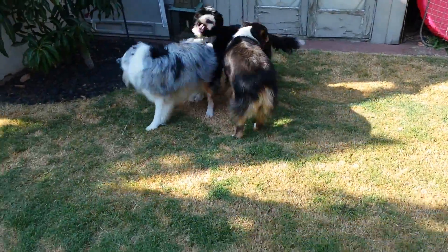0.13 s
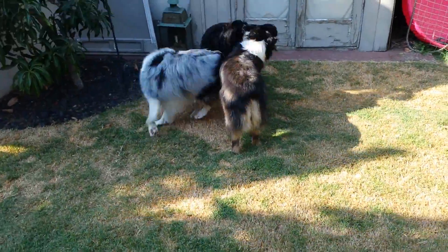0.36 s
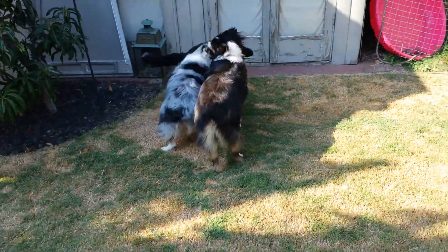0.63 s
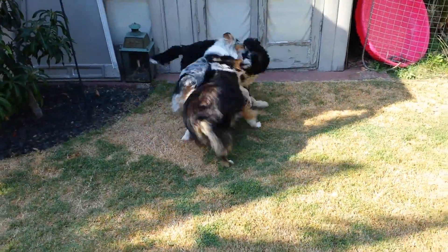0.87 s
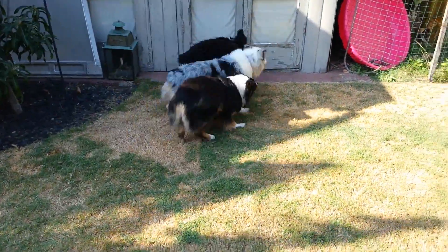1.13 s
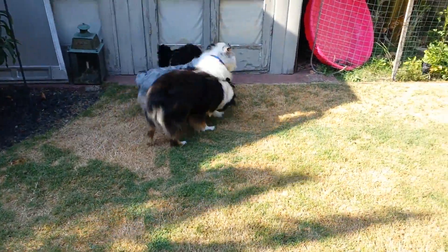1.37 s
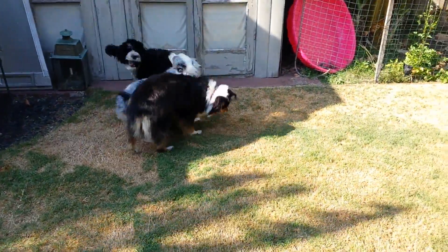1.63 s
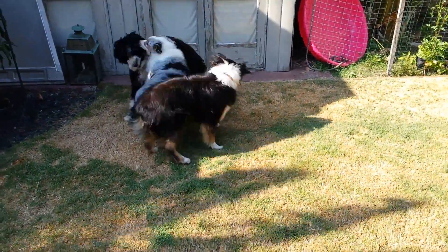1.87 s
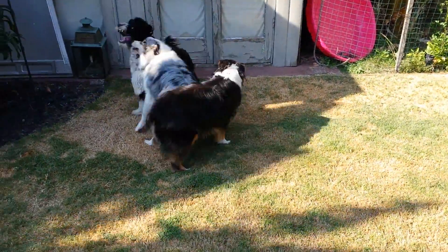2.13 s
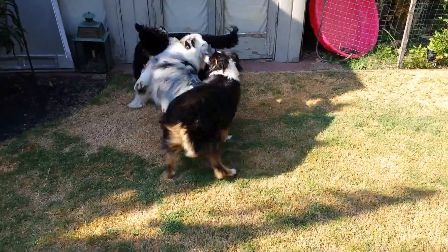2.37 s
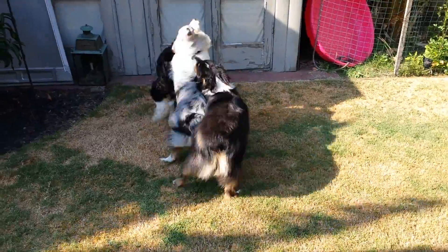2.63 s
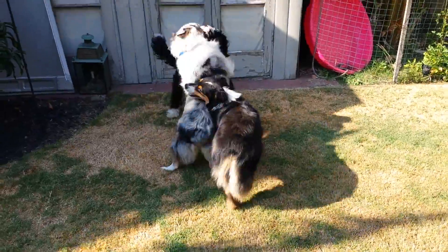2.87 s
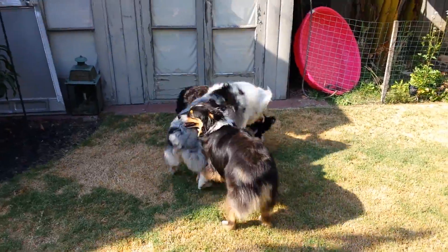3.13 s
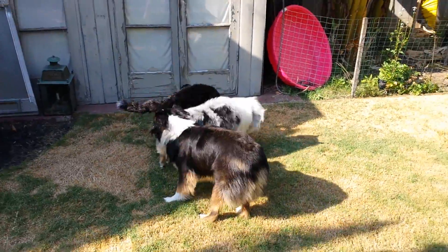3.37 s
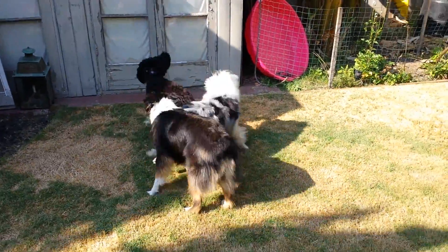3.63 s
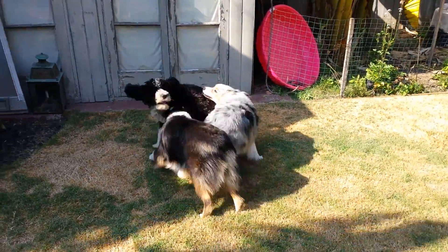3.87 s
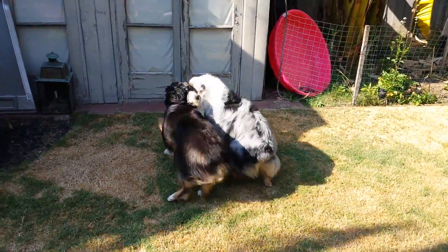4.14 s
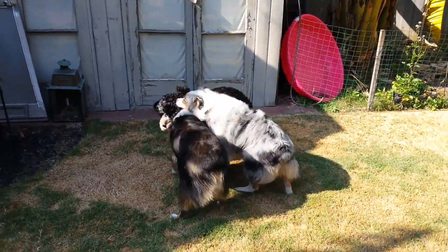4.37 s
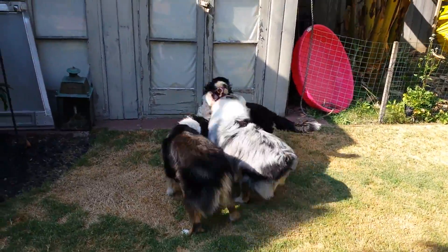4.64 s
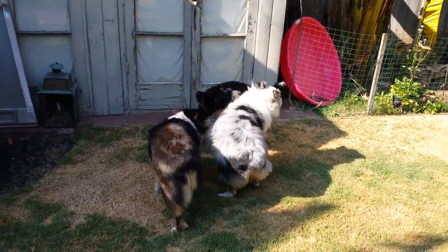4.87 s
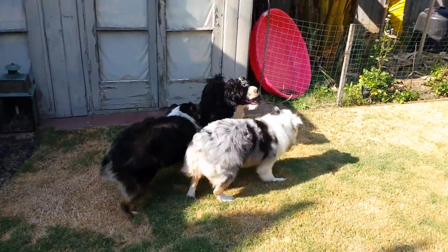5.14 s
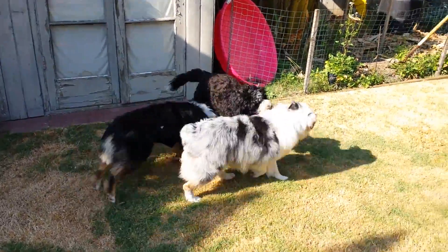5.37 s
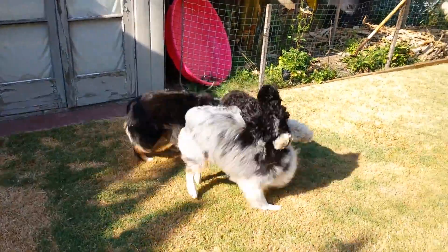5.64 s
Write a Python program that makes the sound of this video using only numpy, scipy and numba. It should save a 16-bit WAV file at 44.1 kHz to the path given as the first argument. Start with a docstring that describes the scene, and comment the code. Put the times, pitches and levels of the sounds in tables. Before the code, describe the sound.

A small outdoor yard with hard walls: rough, yapping barks, abrupt and far louder than everything else, bounce back quickly. Between them come short, low, fluttering growls, puffs of breath, crackly paw scuffs and tiny metallic tag clicks. Barks cluster at the start, then appear singly; growling thickens late, with a brief whimper before the final bark. Compact stereo microphone, quiet airy rumble beneath.

```python
"""Dogs wrestling in a walled yard

Low growls swell between hoarse barks (pulsed folds through mouth and throat resonances) that slap back off
shed and fences (delays, feedback lines). A thin whine (sine) and huffs (noise bursts) join in, paws scuff
dry grass (grains and hiss), collar tags tick (noise and decaying sines), and a faint rumble and air
(shaped noise) lie underneath. Two close ports hear it all."""
import sys
import numpy as np
from scipy import signal
from scipy.fft import rfft, irfft
from scipy.io import wavfile
from scipy.ndimage import uniform_filter1d
from numba import njit

SR = 44100
rng = np.random.default_rng(int(sys.argv[2]) if len(sys.argv) > 2 else 0)


def volts_from_db(level):
    """Convert decibel levels to linear amplitude ratios."""
    exponent = np.asarray(level, float) / 20
    return 10 ** exponent


def inscribe(sig):
    """Save sig as 16-bit PCM at rate SR to the path in sys.argv[1].

    A 1-D sig is mono; a 2-D sig holds one channel per row.
    Samples are clipped to [-1, 1] before scaling.
    """
    pcm = np.round(np.clip(np.atleast_2d(sig).T, -1, 1) * 32767)
    wavfile.write(sys.argv[1], SR, pcm.astype(np.int16))


N = 253575
TIME = np.arange(N) / SR


def unit(x):
    """Scale to rms 1."""
    return x / np.sqrt(np.mean(x ** 2))


@njit
def svf(x, hz, width_hz):
    """State-variable band-pass with a moving centre, gain 1 there."""
    out, band_state, low_state = np.empty(len(x)), 0., 0.
    for i in range(len(x)):
        g, k = np.tan(np.pi * hz[i] / SR), width_hz / hz[i]
        v = (band_state + g * (x[i] - low_state)) / (1 + g * (g + k))
        band_state = 2 * v - band_state
        low_state += 2 * g * v
        out[i] = k * v
    return out


def band(x, hz, width_hz):
    """A steep resonance: the band-pass twice."""
    hz = hz + np.zeros(N)
    once = svf(x, hz, 1. * width_hz)
    return svf(once, hz, 1. * width_hz)


def resonate(x, modes):
    """Parallel resonances, neighbours in opposite sign; rms 1."""
    total = 0
    for k, (hz, width_hz, db) in enumerate(modes):
        total = total + (-1) ** k * volts_from_db(db) * band(x, hz, width_hz)
    return unit(total)


def shape(x, points, power=1.0):
    """Colour by (f/Hz, gain/dB) points joined on a log axis; power scales the dB."""
    hz, db = np.transpose(points)
    log_f = np.log(np.arange(N // 2 + 1) * SR / N + 1)
    gain = volts_from_db(power * np.interp(log_f, np.log(hz), db))
    return irfft(rfft(x) * gain, N)


def walk(rate_hz):
    """Random levels joined by straight ramps 1 / rate_hz long; rms near 1."""
    k = int(SR / rate_hz)
    held = np.repeat(rng.standard_normal(N // k + 1), k)
    return 1.3 * uniform_filter1d(held, k)[:N]


def swells(start_s, hold_s, db, rise_db_s, fall_db_s):
    """Level in dB of the loudest sound at each moment; each rises steadily to start, holds, falls steadily."""
    coarse = TIME[::32]
    t = coarse - start_s[:, None]
    rise = rise_db_s * np.minimum(t, 0)
    fall = fall_db_s * np.maximum(t - hold_s[:, None], 0)
    rows = db[:, None] + rise - fall
    return np.interp(TIME, coarse, rows.max(axis=0))


@njit
def folds(hz, rough, chance, jitter, shimmer):
    """A pulse each time the vocal folds close; rough cycles scatter in length and strength."""
    pulses, phase, p, k = np.zeros(len(hz) + 1), np.empty(len(hz)), 0., 0
    for i in range(len(hz)):
        step = hz[i] * np.exp(jitter * rough[i] * chance[k, 0]) / SR
        p += step
        if p >= 1:
            p, k = p - 1, k + 1
            size = np.exp(shimmer * rough[i] * chance[k, 1]) / np.sqrt(step)
            # split between two samples to place the pulse between them
            pulses[i] += size * p / step
            pulses[i + 1] += size * (1 - p / step)
        phase[i] = p
    return pulses[:-1], phase


def larynx(hz, rough, jitter, shimmer):
    """Pulses plus breath that puffs once a cycle, the breath alone, and the bare fundamental."""
    chance = np.clip(rng.standard_normal((N // 40, 2)), -2, 2)
    pulses, phase = folds(hz, rough, chance, jitter, shimmer)
    breath = unit(np.exp(-phase / 4.8) * rng.standard_normal(N))
    tone = np.sqrt(2) * np.sin(2 * np.pi * phase)
    return pulses + rough * breath, breath, tone


def barks():
    """Pitch shoots up through a narrow mouth resonance that rings when a harmonic meets it."""
    # one row a bark: mouth resonance jaw shut f/Hz, jaw open f/Hz, least roughness (0-1)
    jaws = [(850, 800, .33), (520, 745, .13), (650, 630, .22), (745, 742, .22), (730, 770, .18)]
    # throat resonances, jaw open: f/Hz, width/Hz, relative level/dB
    throat = [(1213, 260, 10), (1780, 700, -1.5), (2338, 200, -2.5), (2687, 250, -17)]
    # bands of hoarse breath: f/Hz, width/Hz, mean level re mouth/dB
    rasp_bands = [(5485, 1200, -27), (7310, 1020, -27.5)]
    which, hz, level_db, upper_db, age_s = bark_controls()
    hz = hz * (1 + .01 * walk(40))  # the pitch wavers
    level_db = uniform_filter1d(level_db, SR // 200)
    shut_hz, open_hz, rough = np.array(jaws)[which].T
    rough = rough * np.clip(300 / hz, 1, 1.7)  # low notes are hoarser
    source, breath, tone = larynx(hz, rough, jitter=.13, shimmer=1.1)

    jaw = np.clip((hz - 250) / 90, 0, 1)  # the jaw drops as the pitch climbs
    mouth_hz = shut_hz + jaw * (open_hz - shut_hz)
    mouth = unit(band(source, mouth_hz, 246.0))
    modes = [(f * (1 + 0.048 * (jaw - 1)), width_hz, db) for f, width_hz, db in throat]
    upper = volts_from_db(upper_db) * resonate(source, modes)
    rasp = 0
    for f, width_hz, db in rasp_bands:
        rasp = rasp + volts_from_db(db + 3.05 * walk(44.56)) * unit(band(breath, f, width_hz))

    # the fundamental sounds through the chest, fades as the pitch climbs, and dies away after 50 ms
    chest_db = np.minimum(level_db, -27)
    chest_db = chest_db - 0.29 * np.clip(hz - 250, 0, None) - 200 * np.clip(age_s - .05, 0, None)
    return volts_from_db(level_db - 1.5) * (mouth + upper + rasp) + volts_from_db(chest_db) * tone


def bark_controls():
    """Which bark sounds, its pitch, its level with onset and close, its upper throat and its age."""
    # one table a bark: t/s, mean pitch f/Hz, mouth level/dB (before smoothing and trim), upper throat re mouth/dB
    contours = [
        [(0.0, 271.6, -2, -23), (0.024, 295, -14.5, -9.5), (0.042, 410.4, -10, -11.5),
         (0.098, 447.7, -13.5, -9), (0.12, 377.4, -12, -5), (0.152, 273.6, -22, -4), (0.2, 205.7, -35.5, 7)],
        [(0.29, 250, -27.5, -29), (0.336, 273.9, -22, 1), (0.378, 364.5, -9.5, -9), (0.396, 349.5, -28.5, 12),
         (0.43, 379.3, -10, -6), (0.45, 374.3, -17, 6), (0.486, 272.1, -29, 4.5), (0.52, 232.7, -37.5, 8)],
        [(1.53, 174.6, -41, -8), (1.564, 227.6, -19, -13.5), (1.594, 314, -19, -0.5), (1.608, 315.5, -5.5, -14),
         (1.62, 324.9, -34.5, 8.5), (1.636, 334.8, -7.5, -8), (1.674, 317.9, -27, 8), (1.692, 265.6, -16, -6),
         (1.73, 211.8, -39, 10.5)],
        [(3.7, 151.8, -44.5, -8), (3.742, 227, -23.5, -10.5), (3.79, 254.7, -10, -3.5),
         (3.818, 304.9, -19, 2.5), (3.838, 379.3, -11, -4), (3.872, 374, -15.5, -6.5), (3.898, 282.1, -21, 1.5),
         (3.93, 273.1, -31.5, 7)],
        [(5.582, 165.4, -27, -9), (5.614, 230.3, -26, -11.5), (5.664, 288.3, -16.5, -9.5),
         (5.69, 348.5, -11.5, -5), (5.72, 388.4, -23.5, 7.5), (5.75, 381.5, -15.5, 5)],
    ]
    onset_db_s, close_db_s = 695, 233
    start, end = np.array([(b[0][0], b[-1][0]) for b in contours]).T
    which = np.searchsorted(start[1:], TIME + .03)  # switches 30 ms ahead, for the onset
    s, *columns = np.vstack(contours).T
    inside = np.clip(TIME, start[which], end[which])
    hz, db, upper_db = (np.interp(inside, s, c) for c in columns)
    before_s = np.clip(start[which] - TIME, 0, None)
    after_s = np.clip(TIME - end[which], 0, None)
    level_db = db - onset_db_s * before_s - close_db_s * after_s
    return which, hz, level_db, upper_db, TIME - start[which]


def growls():
    """Slow uneven folds behind a nearly shut mouth: a wobbling chest tone under a rattle."""
    # full voice t/s, hold/s, first mean pitch f/Hz, last mean pitch f/Hz, chest tone mean level/dB,
    # mouth mean level/dB
    voice = [(0.169, 0.11, 205.9, 139.6, -33.5, -63), (0.547, 0.18, 150.1, 139.6, -36, -43),
             (1.172, 0.021, 175.8, 185.4, -40, -51.5), (2.053, 0.099, 117.5, 128.2, -38.5, -50.5),
             (2.197, 0.08, 151.3, 166.4, -38.5, -42.5), (2.323, 0.043, 135.1, 124.8, -41.5, -45.5),
             (2.555, 0.065, 141.6, 125.4, -42.5, -53), (2.635, 0.043, 123.8, 122.9, -33, -43.5),
             (2.831, 0.036, 129.1, 131.8, -38, -51.5), (3.19, 0.1575, 156.8, 137, -32, -50.5),
             (3.403, 0.05, 152.6, 156.4, -35, -46), (3.693, 0.0547, 126.8, 148.8, -30, -42.5),
             (4.651, 0.1, 134.7, 145.5, -38, -40), (4.81, 0.052, 153.7, 164.9, -32, -40),
             (5.07, 0.0496, 139.8, 186.2, -30.5, -35.5), (5.12, 0.058, 151.7, 149.9, -52, -35.5),
             (5.214, 0.18, 132, 128, -30.5, -37)]
    # throat resonances at lip factor 1 and mouth level -38.5 dB: f/Hz, width/Hz, relative level/dB
    throat = [(543, 348, 4.5), (1130, 246, 2), (1683, 350, -5)]
    # shape of the growling mouth: t/s, mean factor on its resonances
    lip_shape = [(2.05, 1.1), (2.2, 1.2), (2.33, 0.98), (4.63, 1.103), (4.75, 0.98), (4.85, 1.09),
                 (5.09, 1.077), (5.2, 0.93), (5.4, 1.06)]
    rise_db_s, fall_db_s, slowest_mouth_rise_db_s = 600, 382, 260
    start, hold, first_hz, last_hz, chest_db, mouth_db = np.transpose(voice)
    knots_s = np.ravel([start, start + hold], order="F")
    hz = np.interp(TIME, knots_s, np.ravel([first_hz, last_hz], order="F"))
    hz = hz * (1 + .05 * walk(30))  # the pitch wavers
    chest_db = swells(start, hold, chest_db, rise_db_s, fall_db_s)
    # loud growls burst out
    mouth_rise_db_s = slowest_mouth_rise_db_s * np.maximum(1, volts_from_db(2.5 * (mouth_db[:, None] + 40)))
    mouth_db = swells(start, hold, mouth_db, mouth_rise_db_s, fall_db_s)
    source, breath, tone = larynx(hz, np.full(N, .2), jitter=.3, shimmer=1.4)

    # the mouth keeps changing shape
    lips = np.interp(TIME, *np.transpose(lip_shape)) * (1 + .03 * walk(20))
    # soft growls are duller
    modes = [(f * lips, width_hz, db + 0.36 * k * (mouth_db + 38.5))
             for k, (f, width_hz, db) in enumerate(throat)]
    overtone = volts_from_db(-8.5) * unit(band(source, 2 * hz, 94.0))
    chest = volts_from_db(chest_db + 2.2 * walk(40)) * (tone + overtone)
    rattle = resonate(source + .15 * breath, modes)
    return chest + volts_from_db(mouth_db + 1.2 * walk(40)) * rattle


def whine():
    """A second dog's thin falling whine under the last growl: a wavering sine."""
    # one table a call: t/s, mean pitch f/Hz, mean level/dB
    calls = [
        [(5.13, 660, -28.5), (5.165, 612, -31), (5.21, 545.7, -34.5), (5.39, 540.5, -41)],
    ]
    s, pitch_hz, level_db = np.vstack(calls).T
    hz, db = np.interp(TIME, s, pitch_hz), np.interp(TIME, s, level_db)
    is_open = sum((TIME >= c[0][0] - .01) & (TIME <= c[-1][0] + .01) for c in calls) > 0
    gate = uniform_filter1d(1. * is_open, SR // 50, mode="nearest")
    cycles = np.cumsum(hz * (1 + 0.01001 * walk(50))) / SR
    return gate * volts_from_db(db + 2 * walk(27)) * np.sin(2 * np.pi * cycles)


def huffs():
    """Short unvoiced puffs: breath rings the mouth and hisses past the teeth."""
    # t/s, peak level of the mouth noise/dB, mouth resonance f/Hz
    puffs = [(0.979, -40, 680), (1.19, -42, 1150), (2.489, -39, 609.8), (2.525, -37, 700),
             (2.655, -40, 564), (2.913, -44, 690), (2.96, -38, 820), (3.44, -33, 1485), (3.655, -42, 1600),
             (4.797, -38, 1100)]
    s, peak_db, hz = np.transpose(puffs)
    which = np.clip(np.searchsorted(s, TIME) - 1, 0, None)
    u = np.clip((TIME - s[which]) / 0.0064, 0, 30)  # peaks 6.4 ms after the start
    puff = volts_from_db(peak_db[which]) * u * np.exp(1 - u)
    air = rng.standard_normal(N)
    mouth = unit(band(air, hz[which], 540.0))
    teeth = volts_from_db(-15) * unit(band(air, 1440.0, 2000.0))
    return puff * (mouth + teeth)


def paws():
    """Dry blades crackle under paws and bodies: dense grains over a fluttering hiss."""
    # single scuffs: t/s, length/s, mean level/dB
    scuffs = [(0.623, 0.023, -42.5), (1.207, 0.012, -44), (1.82, 0.04, -43.5), (2.016, 0.028, -46),
              (3.166, 0.063, -38), (3.447, 0.0099, -37.5), (5.19, 0.025, -40.5), (5.39, 0.0072, -39.5)]
    # steady rustle of bodies in the grass: t/s, mean level/dB
    rustle = [(0, -39.5), (.5, -45.5), (.8, -48), (2.45, -47.5), (3.3, -44.5), (3.7, -40.5), (4.3, -50.5),
              (4.95, -43.5), (5.1, -39), (5.75, -40)]
    # colour of the grass: f/Hz, relative density/dB per Hz
    grass = [(500, 12.5), (1500, 1.5), (3500, -0.5), (5500, 0.5), (6300, 4), (8100, 0.5), (10500, -8.5),
             (14600, -18)]
    start, length, db = np.transpose(scuffs)
    scuff_db = swells(start, length, db, rise_db_s=144, fall_db_s=225)
    rustle_db = np.interp(TIME, *np.transpose(rustle))
    level = np.hypot(volts_from_db(scuff_db), volts_from_db(rustle_db))
    grain_size = rng.standard_normal(N) * volts_from_db(2.5 * rng.exponential(size=N))
    grains = (rng.random(N) < 1500 / SR) * grain_size  # about 1500 a second
    flutter_db = 1.4 * walk(22)
    hiss = volts_from_db(7.0) * rng.standard_normal((2, N))
    return level * volts_from_db(flutter_db) * unit(shape(unit(grains) + hiss, grass))


def tags():
    """Collar tags knock together: a broad tick and a short thin ring."""
    # t/s, tick level/dB, ring level/dB
    knocks = [(1.0765, -27, -32.5), (3.6396, -25, -38.5), (4.634, -75, -49.5), (4.9375, -32.5, -59),
              (5.6037, -64, -43)]
    # ringing modes: f/Hz, relative level/dB, t60/s
    modes = [(7870, 7.5, 0.015), (10600, -27, 0.036), (12020, -6, 0.086)]
    out, t = np.zeros(N), TIME[:6000]
    ring = sum(volts_from_db(db - 60 * t / t60_s) * np.sin(2 * np.pi * f * t) for f, db, t60_s in modes)
    for s, tick_db, ring_db in knocks:
        noise = np.diff(uniform_filter1d(rng.standard_normal(len(t) + 1), size=3))
        tick = noise * np.exp(-t / 0.0051)
        first = int(s * SR)
        out[first:first + len(t)] += volts_from_db(tick_db) * tick + volts_from_db(ring_db) * ring
    return out


@njit
def fences(x, lags, gain, damp):
    """Eight delay lines that feed each other, duller on every round."""
    line, soft, out = np.zeros((8, 4096)), np.zeros(8), np.zeros((2, len(x)))
    for i in range(len(x)):
        total = 0.
        for k in range(8):
            soft[k] += (1 - damp) * (gain[k] * line[k, (i - lags[k]) & 4095] - soft[k])
            total += soft[k]
            out[k % 2, i] += soft[k]
        for k in range(8):
            line[k, i & 4095] = x[i] + soft[k] - total / 4
    return out


def yard():
    """Distant rumble and air: shaped noise with slow swells, over wavering bass noise."""
    # colour of the air: f/Hz, relative density/dB per Hz
    air_colour = [(33, -42), (45, -10.5), (151, 3.5), (480, -12.5), (2740, -32.5), (8140, -27),
                  (14600, -43.5)]
    air = unit(shape(rng.standard_normal((2, N)), air_colour))
    swell_db, waver_db = 1.2 * walk(3.5), 4 * walk(8)
    bass = volts_from_db(-16.0 + waver_db) * unit(band(rng.standard_normal(N), 73.0, 70.0))
    return volts_from_db(-42.5) * (volts_from_db(swell_db) * air + bass)


def scene():
    """Dogs heard direct, off the nearest walls, and round the yard."""
    # first reflections: left delay t/s, right delay t/s, level/dB
    slaps = [(.012, 0.013, -4.5), (.035, 0.029, -7), (.061, 0.066, -10.5)]
    wall_bass_hz = 285  # thin walls and fences return little below this
    undamped_t60_s, damp, wet_db = 0.43, 0.23, -9
    dogs = barks() + growls() + whine() + huffs()
    # the left port lies about a centimetre further from the dogs
    out = np.array([np.interp(TIME - .00004, TIME, dogs), dogs])
    echo = signal.sosfilt(signal.butter(2, wall_bass_hz, "high", fs=SR, output="sos"), dogs)
    for left_s, right_s, db in slaps:
        slap = [np.interp(TIME - lag_s, TIME, echo, left=0) for lag_s in (left_s, right_s)]
        out = out + volts_from_db(db) * np.array(slap)
    lags = rng.integers(700, 2600, size=8)
    gain = volts_from_db(-60 * lags / SR / undamped_t60_s)
    tail = fences(echo + 1e-18, lags, gain, damp)  # the tiny offset keeps silence from slowing the loop
    return out + volts_from_db(wet_db) * tail + tags() + paws() + yard()


def low_pass(x):
    """Removes everything above the highest recorded frequency."""
    return signal.sosfilt(signal.butter(12, 14700, fs=SR, output="sos"), x)


def record(dry):
    """Close ports hear long waves alike; each port colours the sound its own way."""
    # stereo width: f/Hz, side gain/dB
    width = [(130, -15), (500, -9.5), (1200, 2), (4000, 1)]
    # port colour, scaled for each port below: f/Hz, relative gain/dB
    port_colour = [(600, 1), (1200, 4), (2200, -0.5), (4500, 6.5), (8000, -7)]
    mid = (dry[0] + dry[1]) / 2
    side = shape((dry[0] - dry[1]) / 2, width)
    left = shape(mid + side, port_colour, 0.16)
    right = shape(mid - side, port_colour, -0.88)
    mix = 1.354 * np.tanh(np.array([left, right]) / 1.254)  # the loudest peaks are rounded
    return low_pass(mix)


dry = scene()
out = record(dry)
inscribe(out)
```